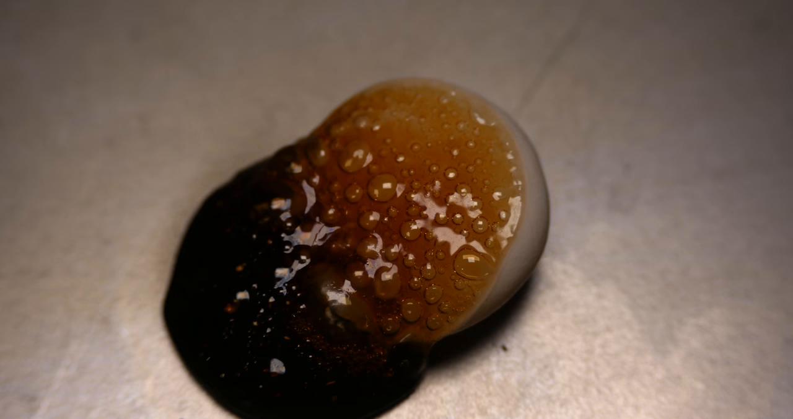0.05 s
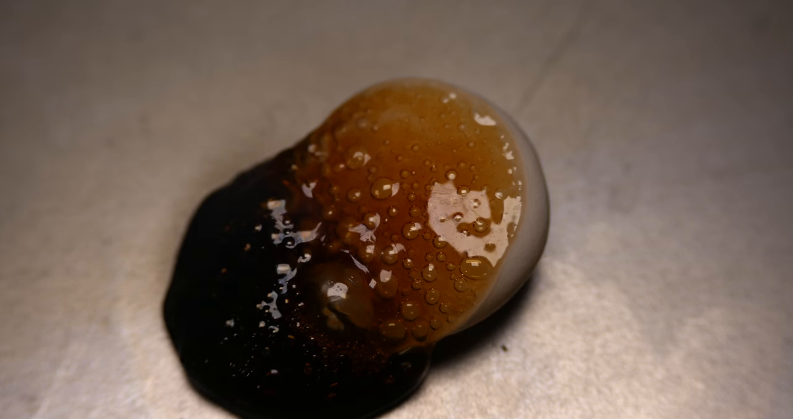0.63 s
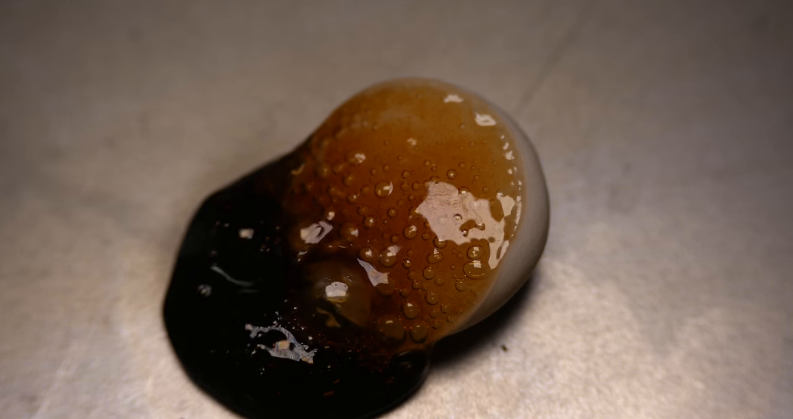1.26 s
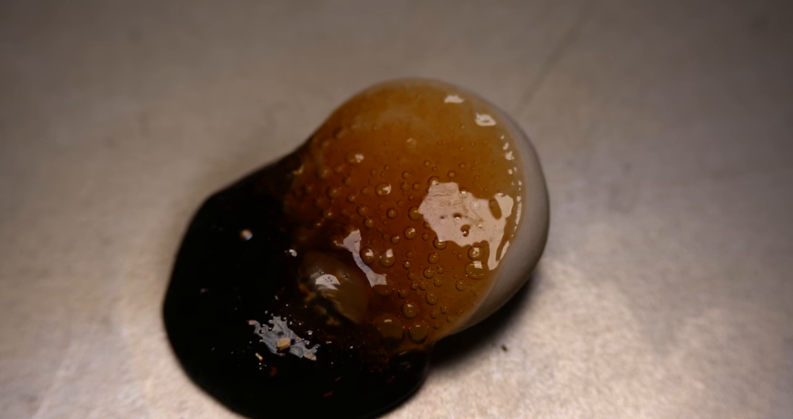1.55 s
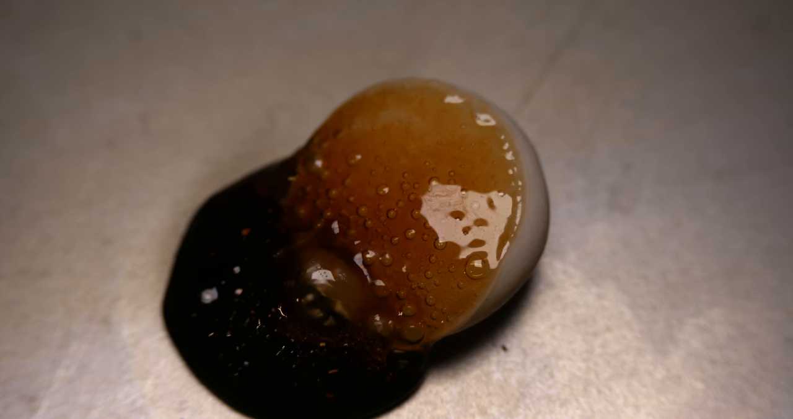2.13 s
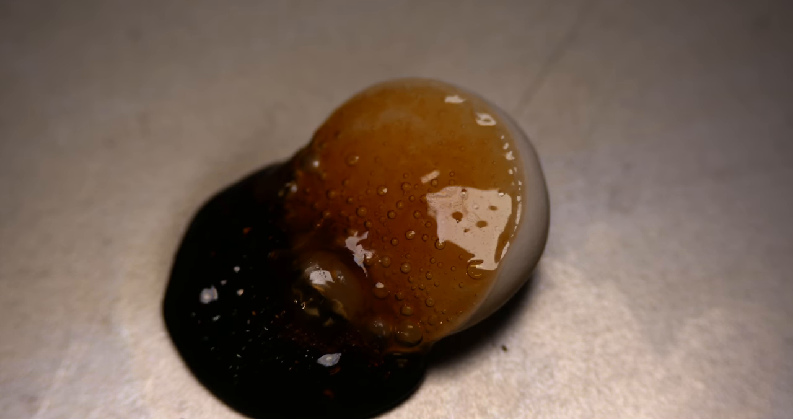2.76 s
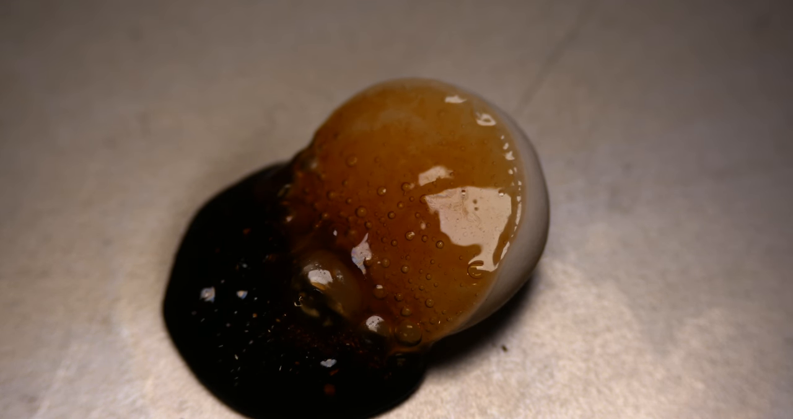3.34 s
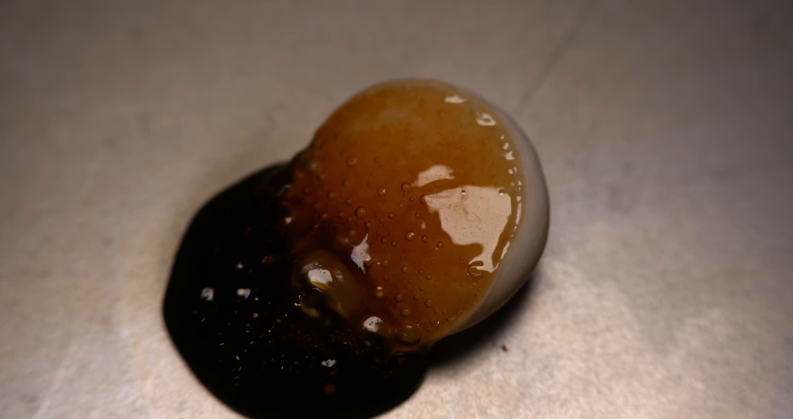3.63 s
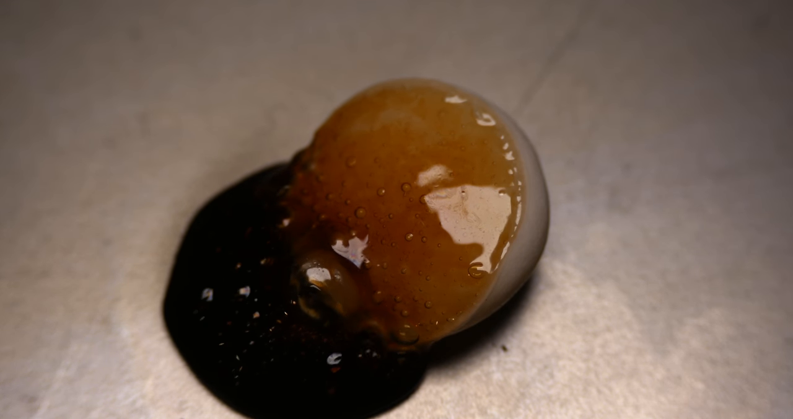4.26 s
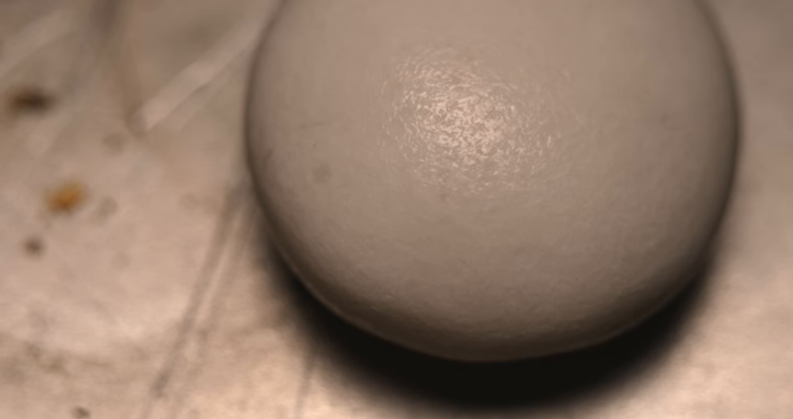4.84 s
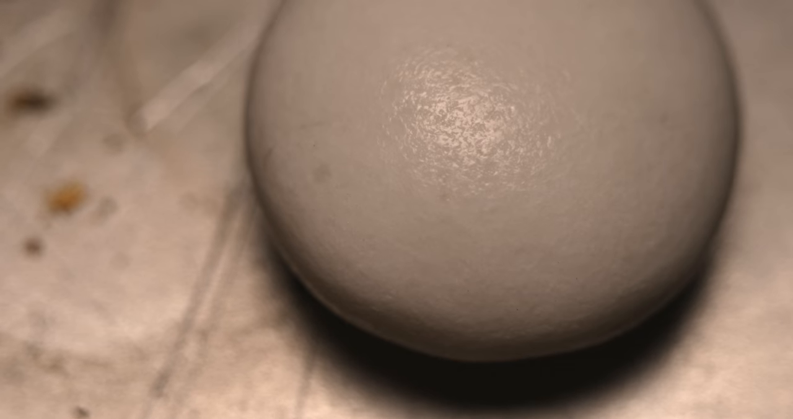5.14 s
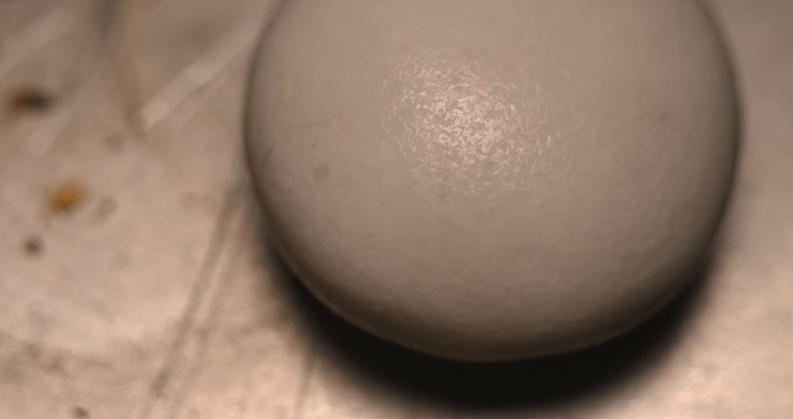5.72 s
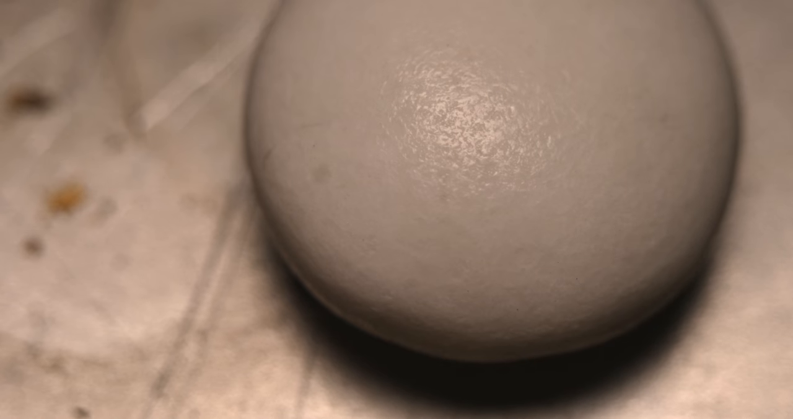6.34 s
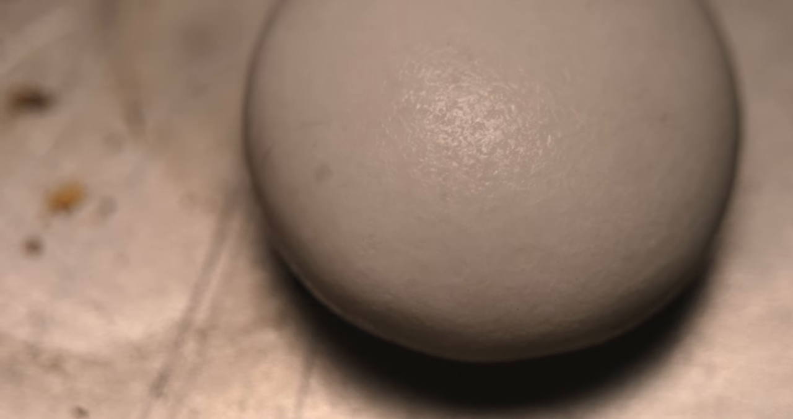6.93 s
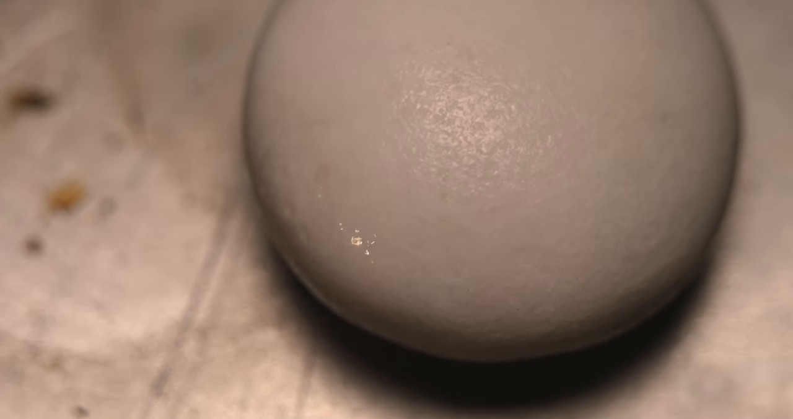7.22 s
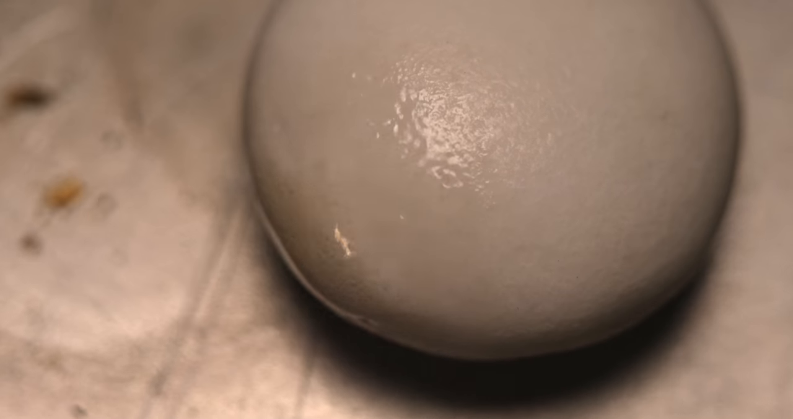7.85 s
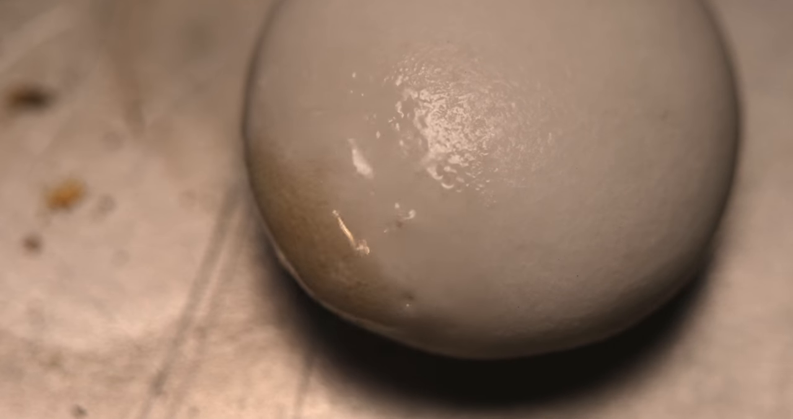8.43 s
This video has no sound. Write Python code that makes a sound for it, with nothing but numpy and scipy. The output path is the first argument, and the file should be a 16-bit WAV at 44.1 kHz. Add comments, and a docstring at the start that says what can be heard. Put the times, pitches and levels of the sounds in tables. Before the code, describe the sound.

A gas blowtorch burns close to the microphone throughout, melting a sweet on a worktop. From the start there is a light, fluttering roar with a high gas hiss and a very faint fizz of tiny bubbles that slowly dies down. Between about 0.3 and 1 second the hiss sweeps downward with an airy, falling whistle, and the flame gives a low throb and a short sagging hum, strongest around 0.6 seconds. The flame then settles, with weaker throbs and a faint, breezy note from the jet on the melt, while the hiss grows slightly. At about 4.5 seconds the sound changes abruptly with a tiny dip in level. The fizz and note stop, and the flame flares briefly into a louder, deeper roar. It burns on steadily with a slight flapping and the same hiss until the end, near 8.7 seconds.

```python
"""A gas blowtorch burns close by, in two stretches joined abruptly by a brief dip in level.
On a molten sweet the flame roars lightly, throbs and hums; the jet sounds a note in the hollow it melts,
bubbles fizz, and echoes sweep the hiss as the nozzle swings in. Then the flame spreads over a whole
round sweet and roars deeper. Throughout, the gas jet hisses in the resonances of the burner."""
import sys
import numpy as np
from scipy.fft import rfft, irfft
from scipy.io import wavfile
from scipy.ndimage import map_coordinates

SR = 44100
rng = np.random.default_rng(int(sys.argv[2]) if len(sys.argv) > 2 else 0)


def materialize(psi):
    """Save the field psi as 16-bit PCM at rate SR to the path in sys.argv[1].

    A 1-D psi becomes a single channel; in a 2-D psi each row is a channel.
    """
    bounded = np.clip(np.atleast_2d(psi).T, -1, 1)
    quanta = np.round(bounded * 32767).astype(np.int16)
    wavfile.write(sys.argv[1], SR, quanta)


N = 378378
TIME = np.arange(N) / SR
FREQ = np.arange(N // 2 + 1) * SR / N
SWITCH_S = 4.486  # molten sweet to whole sweet


def flame_on_molten(jet):
    """Light roar on the melt; the slanting jet splashes, then rushes over it as the nozzle settles."""
    # combustion noise: (frequency [Hz], level [dB])
    spectrum = [(20, -23), (50, -21), (75, -15), (110, 0.5), (160, 0), (260, -0.5), (440, -6.5), (570, -4),
                (850, -8.5), (1200, -17), (1900, -22), (2400, -25), (3100, -34), (4000, -48), (8000, -74)]
    # worktop and wall echoes: (delay [s], gain)
    echoes = [(.001667, -.17), (.003061, -.13), (.004427, .11), (.011485, .15)]
    settled = .5 + .5 * np.tanh((TIME - .7) / .32)  # nozzle travel, 0-1, midway at 0.7 s
    flame = from_db(-49) * roar(spectrum, flutter_db=.54, flutter_hz=75, room_share=1) + throb()
    rush = from_db(blend(-79, -59.5, settled)) * narrow_noise(920, width_hz=360)
    splash = from_db(-69) * (1 - settled) * narrow_noise(1950, width_hz=250)
    notes = rim_whistle(settled) + hollow_note(settled)
    gas = from_db(-56.5 + .44 * TIME) * swept_hiss(jet, settled) + from_db(-69.5) * stream()
    return with_echoes(flame + rush + splash, echoes) + notes + gas + sizzle(per_s=9000) + hum()


def flame_on_whole(jet):
    """The flame catches on the round sweet, flares, flaps in low gusts and rings above the worktop."""
    # combustion noise: (frequency [Hz], level [dB])
    spectrum = [(20, -32), (50, -39), (90, -12), (150, -3), (330, 0), (560, -3.5), (740, -7), (1000, -11),
                (1400, -22), (1750, -22.5), (2300, -29.5), (3100, -41), (4000, -55), (8000, -58)]
    # air resonances above the worktop: (frequency [Hz], width [Hz], level re roar [dB])
    rings = [(252.4, 7.8, -17.5), (405.5, 11, -15)]
    # worktop and wall echoes: (delay [s], gain)
    flame_echoes = [(.002687, -.15), (.004881, .1), (.011967, .11)]
    # echo of the hiss: (delay [s], gain)
    gas_echoes = [(.008107, .15)]
    catch_s, relax_s = .058, .22
    age_s = np.maximum(TIME - SWITCH_S, 0)
    roar_db = -43.2 + 3.5 * (np.exp(-age_s / relax_s) - 2 * np.exp(-age_s / catch_s))
    flame = from_db(roar_db) * roar(spectrum, flutter_db=1.07, flutter_hz=65, room_share=.72)
    gusts = from_db(roar_db - 31 + 4.9 * drift(10)) * narrow_noise(80, width_hz=50)
    ringing = sum(from_db(roar_db + db) * narrow_noise(hz, width_hz) for hz, width_hz, db in rings)
    gas = from_db(-55.5) * jet + from_db(-64) * stream()
    return with_echoes(flame, flame_echoes) + gusts + ringing + with_echoes(gas, gas_echoes)


def roar(spectrum, flutter_db, flutter_hz, room_share):
    """Combustion noise coloured by the room; eddies make the whole flame flutter."""
    # room and worktop resonances: (frequency [Hz], width [Hz], lift at full share [dB])
    modes = [(192, 7.8, 2.5), (248.7, 4.7, 5), (288, 6.7, 4.5), (358, 19, 6), (398, 6.5, 7),
             (441.7, 12.4, 7.5), (479.4, 7.2, 6.5), (614.5, 4.3, 6), (693, 5.2, 5.5)]
    room_db = sum(db * bell(hz, width_hz) for hz, width_hz, db in modes)
    combustion = noise(colour(spectrum) * from_db(room_share * room_db))
    return combustion * from_db(flutter_db * drift(flutter_hz))


def throb():
    """The flame swells in a low room resonance."""
    # swells: (time [s], peak level [dB])
    peaks = [(.09, -55), (.63, -46), (1.3, -52), (2.5, -53.5), (3.15, -55), (3.8, -51)]
    swells = sum(from_db(db) * held(s, s, attack_s=.061, release_s=.061) for s, db in peaks)
    return np.hypot(from_db(-62), swells) * narrow_noise(172, width_hz=6.9)


def hum():
    """At times the flame oscillates as an unsteady, almost pure tone that weakens if its pitch sags."""
    # oscillations: (start [s], end [s], pitch [Hz], sag [Hz/s], level before sag [dB])
    spells = [(0, .24, 101, 10, -58), (0.427, 0.713, 99, 38, -49.5), (1.15, 1.85, 82, 0, -66.5),
              (2.25, 2.65, 86, -1, -68), (3.0, 4.2, 64, 0, -75)]
    fade_db_per_hz = .4
    wobble = 1 + .025 * drift(14)
    out = 0
    for start_s, end_s, hz, sag_hz_per_s, db in spells:
        sag_hz = sag_hz_per_s * np.clip(TIME - start_s, 0, 1)
        tone = rms_one(np.sin(2 * np.pi * np.cumsum((hz - sag_hz) * wobble) / SR))
        envelope = held(start_s, end_s, attack_s=.027, release_s=.056)
        out += from_db(db - fade_db_per_hz * sag_hz) * envelope * tone
    return out * from_db(1.3 * drift(14))


def jet_hiss(waver_db, waver_hz, slow_weight):
    """The gas jet rings the burner tube; each resonance wavers on its own. RMS 1."""
    # burner resonances: (frequency [Hz], width [Hz], level [dB])
    modes = [(5280, 150, 0), (5480, 400, -1), (6300, 1000, -11), (7150, 300, -6), (8610, 380, -12),
             (12690, 260, -31.5), (14830, 400, -38)]
    # broad jet noise: (frequency [Hz], level [dB])
    spectrum = [(1000, -36), (3000, -26.5), (4200, -23.5), (7000, -12.5), (9200, -37), (10500, -34),
                (12000, -47), (15000, -48)]
    bands = [from_db(db) * bell(hz, width_hz) for hz, width_hz, db in modes] + [colour(spectrum)]
    out = 0
    for gain in bands:
        waver = noise(bell(0, waver_hz) + slow_weight * bell(0, 4.4))
        band_rms = np.sqrt(np.mean(gain ** 2))
        out += band_rms * noise(gain) * from_db(waver_db * waver)
    return rms_one(out)


def swept_hiss(jet, settled):
    """The hiss interferes with its surface and rim echoes; the dips slide down as the detour grows."""
    # reflection off the uneven melt: (frequency [Hz], gain [dB])
    reflectance = [(2000, -3), (3700, -1), (4400, 0), (7000, 0), (8600, -4), (10000, -14), (14000, -24)]
    reflected = irfft(rfft(jet) * colour(reflectance), N)
    cancelled_hz = blend(6500, 4265, settled)
    detour_s = 1 / cancelled_hz
    facing = np.sin(np.pi * settled)  # the melt faces the listener in mid-move
    surface = (blend(.34, .52, settled) + .14 * facing) * delayed(reflected, detour_s)
    rim = .26 * facing * delayed(reflected, 3 * detour_s)
    return jet - surface - rim


def hollow_note(settled):
    """The jet sounds the hollow that it melts, louder as the nozzle settles."""
    # note of the hollow: (time [s], pitch [Hz])
    pitches = [(0, 1880), (.8, 1662), (2.2, 1758), (4.48, 1678)]
    # its resonances: (ratio to the note, width [Hz], relative level [dB])
    modes = [(1, 45, -3), (.93, 115, -3)]
    note_hz = np.interp(TIME, *np.transpose(pitches))
    level_db = blend(-72, -61.5, settled)
    return sum(from_db(level_db + db) * narrow_noise(note_hz * ratio, width_hz)
               for ratio, width_hz, db in modes)


def rim_whistle(settled):
    """Swinging in, the jet grazes the rim of the sweet with an airy, falling whistle."""
    grazing = held(start_s=.31, end_s=.88, attack_s=.12, release_s=.2)
    return from_db(-59.5) * grazing * narrow_noise(blend(7250, 6480, settled), width_hz=490)


def stream():
    """Gas streaming round the sweet adds a lower hiss. RMS 1."""
    return noise(bell(4934, width_hz=520))


def sizzle(per_s):
    """Tiny bubbles burst in the melt and merge into a fizz that surges and dies down."""
    # bubble fizz: (frequency [Hz], level [dB])
    spectrum = [(1500, -7), (2700, 1.5), (4000, -13), (8000, -3), (10000, -7.5), (11300, -8), (12500, -16),
                (15000, -16)]
    fall_db_per_s, surge_db = 1.6, 1.5
    bursts = (rng.random(N) < per_s / SR) * rng.standard_normal(N)
    level_db = -72.5 - fall_db_per_s * TIME + surge_db * drift(3)
    return from_db(level_db) * rms_one(irfft(rfft(bursts) * colour(spectrum), N))


def with_echoes(x, echoes):
    """Echoes off nearby surfaces ripple the spectrum."""
    return x + sum(gain * delayed(x, delay_s) for delay_s, gain in echoes)


def delayed(x, delay_s):
    """Fixed or moving delay."""
    return map_coordinates(x, [(TIME - delay_s) * SR], order=3)


def narrow_noise(centre_hz, width_hz):
    """Turbulence in a resonance whose centre may move. RMS 1."""
    phase = 2 * np.pi * np.cumsum(centre_hz * np.ones(N)) / SR
    return rms_one(drift(width_hz) * np.cos(phase) + drift(width_hz) * np.sin(phase))


def noise(gain):
    """Noise shaped by a gain per frequency. RMS 1."""
    return rms_one(irfft(rfft(rng.standard_normal(N)) * gain, N))


def drift(rate_hz):
    """Low-passed random wander. RMS 1."""
    return noise(bell(0, rate_hz))


def bell(hz, width_hz):
    """Resonance gain: 1 at the centre, 1/3 at one width to either side."""
    return 1 / (1 + 2 * ((FREQ - hz) / width_hz) ** 2)


def colour(points):
    """Gain per frequency from (frequency [Hz], level [dB]) points."""
    hz, db = np.transpose(points)
    return from_db(np.interp(np.log(np.maximum(FREQ, 1)), np.log(hz), db))


def held(start_s, end_s, attack_s, release_s):
    """Envelope: 1 from start to end, Gaussian flanks outside."""
    early_s, late_s = np.maximum(start_s - TIME, 0), np.maximum(TIME - end_s, 0)
    return np.exp(-(early_s / attack_s) ** 2 - (late_s / release_s) ** 2)


def blend(before, after, share):
    """Linear move as share goes from 0 to 1."""
    return np.interp(share, [0, 1], [before, after])


def from_db(db):
    """Decibels to gain."""
    return 10 ** (np.asarray(db) / 20)


def rms_one(x):
    """Scale to RMS 1."""
    return x / np.sqrt(np.mean(x ** 2) + 1e-20)


def scene():
    """Torch on the molten sweet, a brief dip, then torch on the whole sweet."""
    jet = jet_hiss(waver_db=1.27, waver_hz=31, slow_weight=.81)
    dip_half_s = .007
    dip = np.clip(np.abs(TIME - SWITCH_S) / dip_half_s, .25, 1) ** 1.4
    torch = np.where(TIME < SWITCH_S, flame_on_molten(jet), flame_on_whole(jet))
    return (dip * torch)[None]


def record(dry):
    """Narrow treble notch and steep low-pass."""
    notch_hz, cutoff_hz = 7800, 15300
    notch = 1 - .96 * bell(notch_hz, width_hz=165)
    low_pass = 1 / np.sqrt(1 + (FREQ / cutoff_hz) ** 300)
    return irfft(rfft(dry) * notch * low_pass, N)


dry = scene()
out = record(dry)
materialize(out)
```